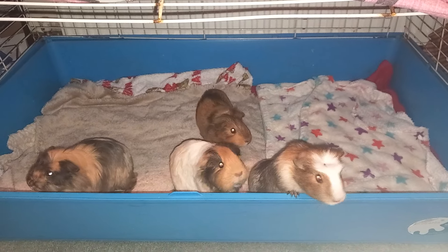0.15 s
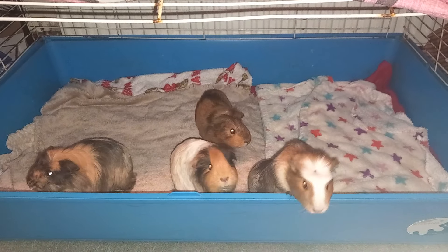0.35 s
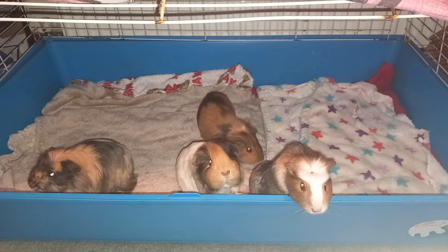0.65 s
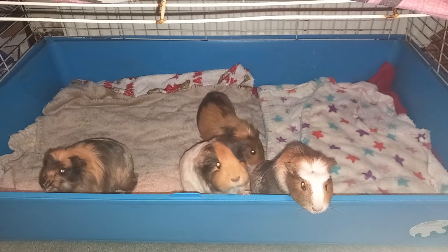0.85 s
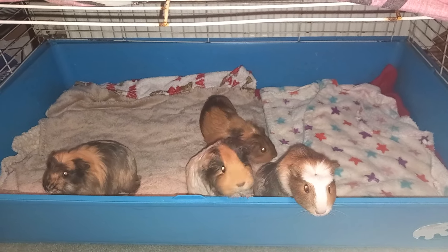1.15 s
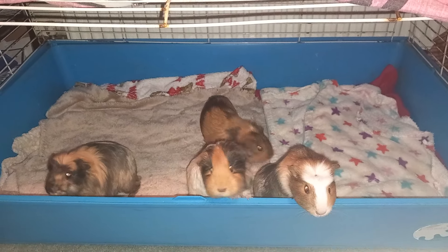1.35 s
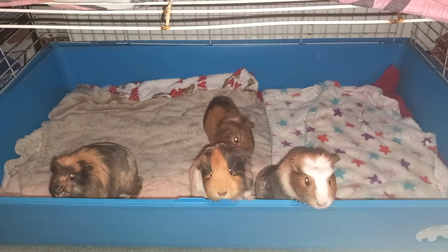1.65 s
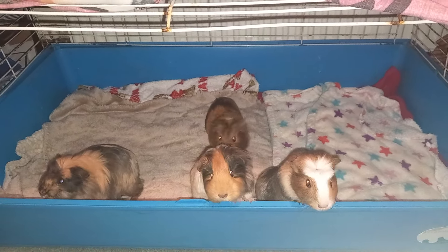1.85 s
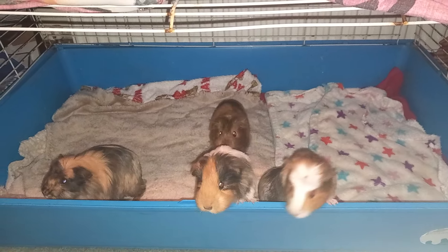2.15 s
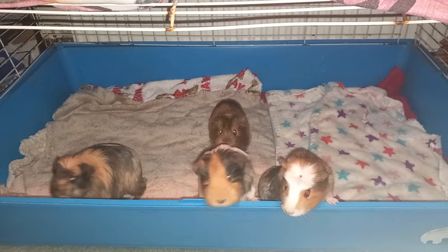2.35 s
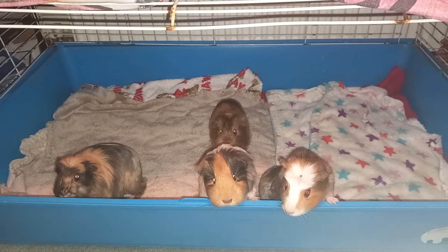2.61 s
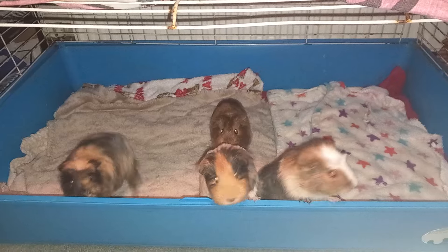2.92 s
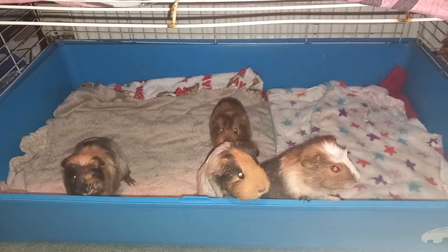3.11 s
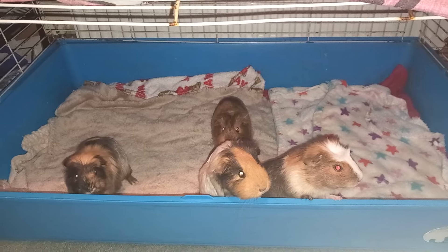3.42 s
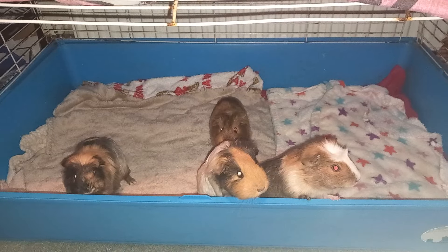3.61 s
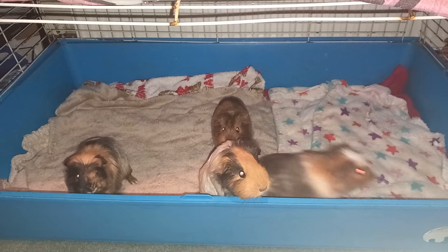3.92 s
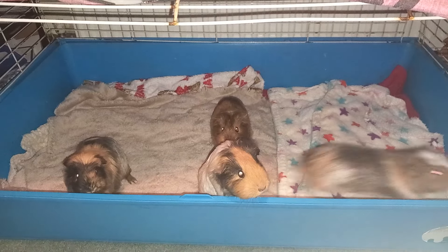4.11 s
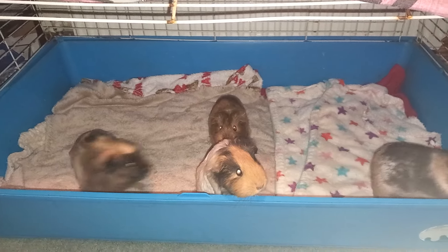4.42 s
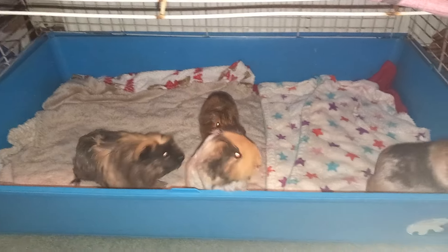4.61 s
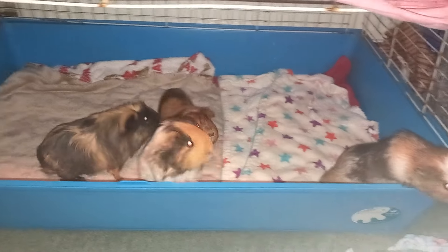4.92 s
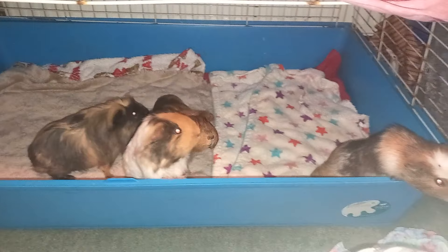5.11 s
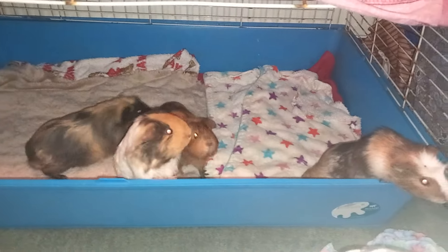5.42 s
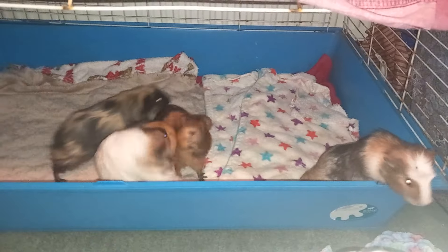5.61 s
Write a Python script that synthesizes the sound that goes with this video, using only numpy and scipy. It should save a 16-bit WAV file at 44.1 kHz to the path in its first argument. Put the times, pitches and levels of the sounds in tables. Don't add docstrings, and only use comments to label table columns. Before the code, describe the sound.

In a quiet room, close to a stereo microphone, guinea pigs murmur and squeak softly. A raspy loud wheek jumps out early, then a cluster of high cries peaks at about three seconds. Paws scuff fleece and claws clack hard on the plastic cage, with dull thumps. Afterwards only small rising squeaks and faint chuts remain over light hiss.

```python
import sys
import numpy as np
from scipy import signal
from scipy.fft import rfft, irfft
from scipy.io import wavfile
from scipy.ndimage import uniform_filter1d

SR = 44100
rng = np.random.default_rng(int(sys.argv[2]) if len(sys.argv) > 2 else 0)


def volts_from_decibels(level):
    exponent = np.asarray(level, float) / 20
    return 10 ** exponent


def output_pcm(signal):
    pcm = np.clip(np.atleast_2d(signal).T, -1, 1) * 32767
    wavfile.write(sys.argv[1], SR, np.round(pcm).astype(np.int16))


N = 254016
EDGE_DB = 19.5

# frequency in Hz, level in dB per Hz.
FLEECE = [(180, -27), (300, -11.5), (621, -13.5), (939, -1.5), (1160, -11), (2010, -0.5), (2860, -9),
          (3410, -8), (7540, -6), (9300, -19), (12500, -14), (15600, -22)]
# frequency in Hz, level in dB.
BREATH = [(400, -7.5), (1200, 7.5), (2400, 8), (3400, -14.5), (4300, -28), (5400, -33), (7700, -17),
          (10500, -44)]


def evened(x):
    return x / np.sqrt(np.mean(x ** 2) + 1e-20)


def read(points, hz):
    f, value = np.transpose(points)
    return np.interp(np.log(hz + 1), np.log(f + 1), value)


def add(mix, s, sound):
    part = mix[max(round(s * SR), 0):][:len(sound)]
    part += sound[:len(part)]


def colour(x, points, lag=((1000, 0),)):
    hz = np.fft.rfftfreq(N, 1 / SR)
    delay = np.exp(-2j * np.pi * hz * read(lag, hz) / SR)
    return irfft(rfft(x) * volts_from_decibels(read(points, hz)) * delay, N)


def wobble(count, seconds):
    width = int(seconds * SR) + 1
    noise = rng.standard_normal(max(count, 9000))[:count]
    return evened(uniform_filter1d(uniform_filter1d(noise, width), width))


def ports(x, side, lag, wet):
    # frequency in Hz, t60 in seconds.
    room = [(300, .14), (2500, .115), (3500, .09), (8000, .11)]
    taps = np.zeros((2, SR // 2))
    at = np.arange(200, SR // 2 - 20, 20)
    at = at + rng.integers(0, 20, (2, len(at)))
    np.put_along_axis(taps, at, rng.choice([-1., 1.], at.shape), 1)
    hz, t, z = signal.stft(taps, SR, nperseg=256)
    tail = signal.istft(z * volts_from_decibels(-60 * t / read(room, hz)[:, None]), SR, nperseg=256)[1]
    size = tail.shape[1]
    wet_gain = volts_from_decibels(read(wet, np.fft.rfftfreq(size, 1 / SR)))
    tail = irfft(rfft(tail) * wet_gain, size) / np.linalg.norm(tail[0])
    left, right = x + signal.fftconvolve(x[None], tail, axes=1)[:, :N]
    return np.array([left, colour(right, [(f, -db) for f, db in side], lag)])


def hush():
    # frequency in Hz, level in dB per Hz.
    floor = [(30, -22), (96, 1), (243, -12), (329, -4.5), (450, -12.5), (600, -13.5), (1240, -17),
             (2500, -17), (3650, -24.5), (7000, -23.5), (9800, -38.5), (12500, -31), (16000, -29)]
    # frequency in Hz, left-right likeness from 0 to 1.
    likeness = [(300, 0.22), (1500, 0.077)]
    frames, hz = N // 256 + 5, np.fft.rfftfreq(1024, 1 / SR)
    a, b, c, d, patches = rng.standard_normal((frames, 513, 5)).T
    patches = evened(uniform_filter1d(uniform_filter1d(patches, 10, 0), 14, 1))
    same = np.clip(read(likeness, hz), -1, 1)[:, None]
    left, other = a + 1j * b, c + 1j * d
    z = np.array([left, same * left + np.sqrt(1 - same ** 2) * other])
    z *= volts_from_decibels(read(floor, hz)[:, None] + 0.5 * patches)
    return volts_from_decibels(-71.5) * evened(signal.istft(z, nperseg=1024, noverlap=768)[1][:, :N])


def thumps():
    # start in seconds, peak in dB, knock in dB.
    feet = [(2.483, -54.5, 3.5), (2.573, -58, 2), (2.694, -49, 4.5), (2.836, -54, 15.5), (3.051, -38, -9.5),
            (3.08, -36, -12.5), (3.094, -33, -8), (3.139, -30, -11.5), (3.178, -35.5, -8),
            (3.203, -50.5, -18), (3.227, -55, 3), (3.444, -51, 5.5), (3.753, -47, 4.5),
            (3.952, -51.5, -8.5), (4.164, -44, -5), (5.619, -55.5, -10), (5.69, -58, -20)]
    # frequency in Hz, level in dB, t60 in seconds.
    panel = [(116.5, -1.5, 0.11), (196, 0.5, .08), (326, 1, .06), (462, -2, 0.067), (970, -1, 0.025),
             (1880, 15, 0.012)]
    out, t = np.zeros(N), np.arange(7000) / SR
    for s, db, knock_db in feet:
        modes = []
        for hz, mode_db, t60 in panel:
            cycles = hz * np.cumsum(1 + 0.14 * wobble(len(t), 0.0043)) / SR
            modes.append(volts_from_decibels(mode_db - 60 * t / t60) * np.sin(2 * np.pi * cycles))
        boom = (1 - np.exp(-t / 0.0049)) * modes[0]
        knock = (1 - np.exp(-t / 0.0021)) * volts_from_decibels(knock_db) * sum(modes[1:])
        add(out, s, volts_from_decibels(db) * (boom + knock))
    return out


def rim():
    # start in seconds, peak in dB, frequency in Hz, t60 in seconds.
    ring = (3.7545, -27, 1800, .025)
    s, db, hz, t60 = ring
    out, t = np.zeros(N), np.arange(3000) / SR
    add(out, s, volts_from_decibels(db - 60 * t / t60) * np.sin(2 * np.pi * hz * t))
    return out


def claws():
    # start in seconds, peak in dB, sharpness from 0 to 1.
    ticks = [(.606, -66, .9), (0.958, -63, 0), (0.9645, -45.5, 0), (2.4844, -36, 0), (2.5197, -42, 0),
             (2.5627, -53, .5), (2.5698, -39, 0), (2.293, -62, .6), (2.768, -47.5, .3), (2.8393, -44, .1),
             (3.0943, -19, 0.5), (3.18, -32, 0.4), (3.2273, -40.5, 0.07), (3.333, -46, .1),
             (3.397, -31, .5), (3.4108, -24, 0.4), (3.4432, -12.5, 0.12), (3.474, -18, 0.11),
             (3.484, -28.5, 0.26), (3.503, -23.5, .9), (3.5234, -25.5, 0.27), (3.5545, -30, .1),
             (3.7568, -33, 0.04), (3.763, -47, 0.2), (3.782, -31, .9), (3.8396, -40, .5), (3.875, -34, .9),
             (3.9328, -40, 0.05), (4.095, -39, .9)]
    out, t = np.zeros(N), np.arange(1500) / SR
    fade = (1 - np.exp(-t / .0004)) * (volts_from_decibels(-60 * t / .014) + .3 * volts_from_decibels(-60 * t / .05))
    for s, db, sharp in ticks:
        burst = rng.standard_normal(len(t)) * fade
        sharpen = np.convolve([1, -sharp], [1, -sharp])
        add(out, s, volts_from_decibels(db - 4.0) * np.convolve(burst, sharpen) / (1 + sharp))
    return colour(colour(out, FLEECE), [(2500, 2.8), (9000, 5.8)])


def paw_moves():
    # start in seconds, length in seconds, level in dB.
    drags = [
        (2.4, 0.35, -71),
        (2.801, 0.1, -68.5),
        (3.001, 0.058, -52),
        (3.094, 0.048, -61.5),
        (3.295, 0.067, -78),
        (3.391, 0.19, -62.5),
        (3.755, 0.34, -64.5),
    ]
    # peak in seconds, peak in dB, rise and fall in seconds, thin hiss in dB.
    strokes = [(2.57, -66.5, 0.03, 0.038, -16), (2.7, -77, 0.051, 0.015, -24),
               (3.095, -41.5, 0.0073, 0.033, -2.5), (3.139, -44.5, 0.02, 0.021, -15.5),
               (3.183, -46, 0.0089, 0.0073, 2), (3.417, -49.5, 0.015, 0.027, -15),
               (3.45, -65.5, 0.012, 0.0325, -15.5), (3.488, -43.5, 0.022, 0.012, -14),
               (3.575, -43.5, 0.011, 0.011, 9.5), (3.589, -54, 0.011, 0.0061, -26),
               (3.6, -85, 0.0042, 0.026, -9.5), (3.841, -60, 0.044, 0.055, 0),
               (3.982, -55.5, 0.11, 0.061, 3), (4.158, -47, 0.066, 0.008, -0.5),
               (5.663, -71, 0.02, 0.016, -1)]
    moves = [([(s, db), (s + length, db)], -17) for s, length, db in drags]
    for s, db, rise, fall, hiss_db in strokes:
        moves.append(([(s - rise, db - EDGE_DB), (s, db), (s + fall, db - EDGE_DB)], hiss_db))
    return moves


def scuffing():
    pressure, hiss = np.zeros((2, N))
    grains = volts_from_decibels(3.0 * np.minimum(rng.exponential(1, N), 5)) * rng.standard_normal(N)
    fizz = evened(colour(grains, FLEECE)) * volts_from_decibels(2.5 * wobble(N, .003))
    for rows, hiss_db in paw_moves():
        s, level_db = np.transpose(rows)
        t = np.arange(s[0], s[-1], 1 / SR)
        ends = np.clip(np.minimum(t - s[0], s[-1] - t) / 0.0086, 0, 1)
        push = ends * volts_from_decibels(np.interp(t, s, level_db) + 3.5)
        add(pressure, s[0], push)
        add(hiss, s[0], push * volts_from_decibels(hiss_db))
    thin = evened(np.convolve(fizz[::-1], [1, -3, 3, -1], "same"))
    return pressure * fizz + hiss * thin


def wheeze():
    # start in seconds, length in seconds, level in dB.
    sniff = (0, 0.24, -63.5)
    # frequency in Hz, level in dB.
    nose = [(2500, -30), (3400, -4), (4290, 6), (4950, -26), (5490, -26), (7700, -1.5), (10500, -24.5),
            (15000, -31)]
    (s, length, db), out = sniff, np.zeros(N)
    add(out, s, volts_from_decibels(db) * signal.windows.tukey(round(length * SR), .15))
    return out * evened(colour(rng.standard_normal(N), nose)) * volts_from_decibels(1.4 * wobble(N, 0.0035))


def voices(calls, throat, breath, jitter, shimmer_db, breath_db, half_db, order, hoarse_db,
           mouths=None, thin_db=np.inf):
    turned = [
        (4.2, 4.3),
        (4.6, 5.8),
    ]
    tone, air = np.zeros((2, N))
    for i, rows in enumerate(calls):
        s, *columns = np.transpose(rows)
        t = np.arange(s[0], s[-1], 1 / SR)
        hz, first_db, upper_db = (np.interp(t, s, c) for c in columns)
        upper_db = np.maximum(upper_db, first_db - thin_db)
        draws = rng.standard_normal((26, 80))
        chance = np.array([np.interp(t - s[0], np.arange(80) * .004, row) for row in draws])
        hz = hz * (1 + jitter * (wobble(len(t), 0.00097) + 0.2 * chance[-1]))
        phase = 2 * np.pi * np.cumsum(hz) / SR
        k = np.arange(.5, min(13, 16000 // hz.min() + .5), .5)[:, None]
        mouth = np.linspace(*mouths[i][:2], len(t)) if mouths else 1
        level_db = upper_db + read(throat, k * hz / mouth) - read(throat, order * hz / mouth)
        if any(a < s[0] < b for a, b in turned):
            level_db -= 5 * np.maximum(k * hz - 2500, 0) / 1000
        level_db[::2] += half_db
        level_db += hoarse_db * chance[:len(k)]
        level_db[1] = first_db + .6 * hoarse_db * chance[1]
        ends = signal.windows.tukey(len(t), min(.012 * SR / len(t), 1))
        swell = volts_from_decibels(shimmer_db * wobble(len(t), .004)) * ends
        waves = np.sin(k * phase + 2 * np.pi * rng.random((25, 1))[:len(k)])
        partials = (k * hz < 16000) * volts_from_decibels(level_db) * waves
        add(tone, s[0], swell * np.sqrt(2) * partials.sum(0))
        puff_db = np.maximum(upper_db, first_db - 13.5) + breath_db
        add(air, s[0], swell * volts_from_decibels(puff_db) * (1 + np.cos(phase)))
    return tone + colour(air * rng.standard_normal(N), breath)


def grunt(row, rise):
    start, length, hz, first_db, third_db = row
    w = np.linspace(-1, 1, 11)
    pitch = hz * (1 + rise * (w + 1) ** 2 / 4)
    return np.transpose([start + (w + 1) / 2 * length, pitch, first_db - 18 * w ** 2, third_db - 6 * w ** 2])


def chuts():
    # start in seconds, length in seconds, pitch in Hz, first and third partial in dB.
    grunts = [(0.06, 0.14, 350.2, -57.5, -54.5), (0.377, 0.046, 315.6, -64.5, -57.5),
              (0.754, 0.046, 319.3, -63, -55), (1.113, 0.086, 316.7, -61.5, -58.5),
              (1.672, 0.14, 319.6, -53.5, -52.5), (1.761, 0.15, 249.2, -68, -73),
              (2.072, 0.1, 309, -55, -56), (4.266, 0.059, 335, -61.5, -70.5),
              (4.495, 0.048, 325, -65.5, -58), (5.07, 0.098, 288.4, -69, -59),
              (4.219, 0.027, 344, -68, -64.5)]
    mouths = [(1.27, 1.396, .05), (0.915, 1.33, .08), (0.86, 1.01, .08), (0.81, 0.78, .12),
              (0.87, 1.2, .18), (1.1, 1.4, .12), (0.82, 1.23, .2), (1.02, 0.5, .08), (0.93, 1.024, .03),
              (0.91, 0.7, .08), (1, 1, .05)]
    # frequency in Hz, level in dB.
    throat = [(600, -16), (1000, 5), (1400, -4), (2000, -18.5), (3000, -24.5), (5200, -43)]
    calls = [grunt(row, mouth[-1]) for row, mouth in zip(grunts, mouths)]
    return voices(calls, throat, BREATH, .022, 2.5, breath_db=-3, half_db=-12, order=3, hoarse_db=5,
                  mouths=mouths)


def squeak(row, kind):
    # pitch in Hz, level in dB.
    second = [(600, -6), (1000, -6), (1400, -13.5), (2000, -23)]
    start, length, from_hz, to_hz, db = row
    bend, attack, release, swell_db, over_db = kind
    u = np.linspace(0, 1, 41)
    hz = from_hz * (to_hz / from_hz) ** (u ** bend)
    ends = np.maximum(1 - u * length / attack, 0) + np.maximum(1 - (1 - u) * length / release, 0)
    first_db = db + swell_db * (2 * u - 1) - EDGE_DB * ends
    return np.transpose([start + u * length, hz, first_db, first_db + over_db + read(second, hz)])


def squeaks():
    # start in seconds, length in seconds, from Hz, to Hz, level in dB.
    climbs = [(0.86, 0.073, 823, 1252, -52.5), (2.14, 0.05, 890, 1620, -48), (2.2, 0.05, 884, 1300, -65),
              (3.62, 0.068, 796, 1062, -57), (3.965, 0.058, 800, 1700, -51), (4.38, .055, 700, 950, -62),
              (5.51, 0.069, 725, 1090, -60), (5.655, 0.1, 532, 940, -62)]
    crests = [
        (4.015, 0.07, 1700, 2050, -50),
        (4.105, 0.062, 2000, 2160, -50),
    ]
    pips = [(3.8, .04, 1020, 1050, -66), (0.412, 0.045, 830, 900, -53), (5.128, 0.027, 620, 760, -64),
            (4.648, 0.04, 1000, 1300, -66), (0.98, .05, 760, 950, -69), (0.246, 0.032, 1100, 1480, -56),
            (0.553, 0.032, 960, 960, -61), (0.604, 0.024, 1020, 830, -55), (0.622, 0.03, 830, 810, -60),
            (0.655, 0.03, 816, 1150, -63), (0.722, 0.035, 856, 846, -61), (2.18, 0.028, 1780, 1740, -56),
            (2.212, 0.03, 1780, 2000, -51), (2.262, 0.036, 1890, 1870, -48), (2.168, .03, 950, 1200, -56),
            (3.883, 0.035, 870, 960, -50), (4.992, 0.045, 770, 830, -65), (5.195, 0.045, 720, 850, -67),
            (5.245, .05, 900, 760, -67), (1.735, .04, 1000, 1300, -53), (1.755, .04, 870, 1150, -54),
            (1.785, .07, 1280, 1380, -53), (1.865, .05, 1450, 1600, -58)]
    honks = [
        (0.918, .055, 1060, 1170, -61),
        (0.187, .05, 920, 1110, -59),
        (.148, .03, 570, 710, -61),
        (.125, .09, 770, 785, -60),
    ]
    # bend of the glide, attack and release in seconds, swell and overtone in dB.
    climb, crest = (1.4, 0.02, 0.009, 1.6, -3), (.8, .006, .012, 2, -8)
    pip = (1, .008, .012, -1, -8)
    honk = (0.887, 0.02, 0.031, 0.6, 12.1)
    # time in seconds, pitch in Hz, first and second partial in dB.
    early = [
        [(0.0, 637, -61, -33.5), (0.01, 627.5, -68, -58), (0.04, 619, -62, -50), (0.06, 730, -68, -50.5),
         (0.075, 806, -85, -56)],
        [(0.393, 622, -76, -71), (0.403, 629, -72, -64), (0.435, 656, -64, -56.5), (0.453, 763, -66, -63.5),
         (0.5, 833, -78, -57)],
        [(0.46, 931, -56, -82), (0.496, 1165, -52.5, -80), (0.534, 1538, -58, -86), (0.542, 1634, -59, -112),
         (0.548, 1830, -57, -80), (0.564, 1860, -50.5, -81), (0.576, 2236, -62.5, -81),
         (0.59, 2200, -70.5, -68), (0.645, 2440, -68, -114)],
        [(0.77, 633, -76, -67), (0.8, 667.2, -59.5, -59), (0.83, 703, -61, -63.5), (0.844, 895, -63, -65),
         (0.854, 922, -51.5, -66), (0.878, 1192, -61, -72), (0.905, 1284, -51, -83)],
        [(1.172, 1060, -65, -72), (1.182, 1280, -60, -80), (1.19, 1440, -58, -73), (1.216, 1804, -62, -76),
         (1.228, 1940, -50.5, -85), (1.252, 1934, -59, -73), (1.256, 2015, -53.5, -86),
         (1.282, 2120, -57.5, -85), (1.32, 2255, -78, -97)],
        [(2.712, 1025, -42, -73), (2.72, 935, -61, -62), (2.744, 834, -49.5, -77), (2.762, 1460, -52.5, -70),
         (2.78, 1603, -51.5, -80), (2.79, 2140, -56, -88), (2.795, 2214, -62, -99)],
    ]
    late = [
        [(4.225, 707, -85, -68), (4.245, 728, -66, -62), (4.271, 695, -59, -62), (4.305, 775, -61, -57.5),
         (4.321, 1027, -60.5, -67), (4.335, 1180, -55.5, -46)],
        [(4.33, 1094, -61, -58.5), (4.362, 1247, -55, -63.5), (4.378, 1513, -57.5, -66.5),
         (4.432, 1907, -52.5, -67.5), (4.46, 1984, -54, -76), (4.468, 2280, -49.5, -99),
         (4.476, 2760, -65, -88.5), (4.508, 3124, -58, -87), (4.535, 3520, -73, -77)],
        [(4.68, 644, -83.5, -76), (4.698, 627.5, -69.5, -69.5), (4.72, 640, -63.5, -70), (4.75, 736, -61, -66),
         (4.796, 1023, -55.5, -63), (4.816, 1074, -56.5, -59), (4.83, 1040, -61, -61.5)],
        [(4.825, 1176, -57, -74), (4.839, 1390, -70, -63), (4.859, 1330, -65.5, -61), (4.879, 1750, -62, -82),
         (4.899, 1747, -58, -78.5), (4.911, 2150, -54.5, -107), (4.917, 2360, -57, -98),
         (4.928, 2900, -73, -116)],
        [(5.14, 1038, -64.5, -89.5), (5.168, 1185, -59, -63), (5.178, 1190, -65.5, -62),
         (5.196, 1595, -63, -67.5), (5.204, 2010, -60, -123), (5.21, 2010, -64, -95), (5.23, 2027, -83, -99)],
        [(5.388, 660, -82, -94), (5.4, 674, -73, -79), (5.416, 644.4, -63.5, -68), (5.46, 683, -61, -75.5),
         (5.484, 860, -62, -76), (5.51, 1001, -68, -75.5), (5.56, 1085, -73, -75)],
    ]
    # frequency in Hz, level in dB.
    near_throat = [(1200, 3), (1900, -6), (2500, -10), (3000, -15), (3700, -19), (4500, -21), (5200, -34.5),
                   (7800, -28.5)]
    far_throat = [(1200, 1), (1900, 5.5), (2500, 1.5), (3200, -9), (4200, -22), (5200, -38), (7800, -29.5),
                  (10500, -45)]
    kinds = (climbs, climb), (crests, crest), (pips, pip), (honks, honk)
    short = [squeak(row, kind) for rows, kind in kinds for row in rows]
    out = voices(short, near_throat, BREATH, .02, 3.5, breath_db=-2, half_db=-33.5, order=2,
                 hoarse_db=1.5, thin_db=25)
    held = voices(early, near_throat, BREATH, .011, 2, breath_db=-9, half_db=-28, order=2,
                  hoarse_db=3, thin_db=25)
    held += voices(late, far_throat, BREATH, .015, 2.5, breath_db=-4, half_db=-26, order=2,
                   hoarse_db=4.5, thin_db=25)
    return out + volts_from_decibels(6.0) * held


def wheeks():
    # time in seconds, pitch in Hz, first and second partial in dB.
    clear = [
        [(2.788, 2177, -53, -82), (2.82, 2203, -58, -77.5), (2.853, 2060, -50, -74)],
        [(2.465, 2587, -38, -79), (2.49, 3095, -29, -87), (2.525, 2810, -82, -84)],
        [(2.855, 2052, -49.5, -48), (2.87, 2088, -32.5, -50), (2.905, 2134, -27, -41), (2.92, 2331, -16, -36),
         (2.945, 2370, -15, -41.5), (2.96, 2501, -24, -38.5), (2.975, 2612, -11.5, -38),
         (2.997, 2709, -14.5, -48), (3.025, 2820, -45, -65.5)],
    ]
    rasps = [
        [(1.375, 2473, -31, -74), (1.39, 2320, -24, -59.5), (1.428, 2230, -34, -59), (1.443, 2393, -17, -61),
         (1.466, 2410, -23.5, -64), (1.485, 2904, -27.5, -56.5), (1.51, 3624, -47, -51.5),
         (1.535, 3830, -78, -76)],
        [(2.325, 1900, -73, -96), (2.337, 1930, -43, -87), (2.35, 2034, -55, -93), (2.375, 1943, -44.5, -79),
         (2.41, 2194, -50, -85), (2.435, 2722, -25.5, -67.5), (2.455, 2538, -29.5, -68),
         (2.49, 2540, -30.5, -103)],
    ]
    flare = [
        (2.997, 3206, -27, -38),
        (3.01, 3608, -32.5, -31),
        (3.02, 3800, -34, -34),
        (3.031, 4050, -38, -34.5),
        (3.045, 4136, -52.5, -47.5),
    ]
    # frequency in Hz, level in dB.
    throat = [(1500, -2.5), (4200, 2), (6500, 0), (7900, 8), (9000, -4), (10800, -4), (12500, -11.5),
              (14200, -4.5), (16000, -9.5)]
    rasp_throat = [(1500, 1.5), (3500, 9.5), (4600, -2), (5800, 3), (7000, 11.5), (8100, 13), (9300, -2.5),
                   (12500, -7.5), (14500, -3)]
    out = voices(rasps, rasp_throat, rasp_throat, .006, 1.2, breath_db=-28, half_db=-6, order=2, hoarse_db=4.5)
    out += voices(clear, throat, throat, .008, 1, breath_db=-24, half_db=-30, order=2, hoarse_db=2.5)
    out += voices([flare], throat, throat, .016, 2.5, breath_db=-12, half_db=-18, order=2, hoarse_db=3)
    return out


def scene():
    # frequency in Hz, left minus right in dB.
    voice_side = [(380, 0), (700, 7), (1290, 8.5), (2380, 10.5), (4400, 1), (8100, -1), (15000, -4)]
    paw_side = [(380, -2), (700, 3), (2380, 4.5), (4400, -7), (8100, -8), (15000, -11)]
    # frequency in Hz, lateness of the right port in samples.
    voice_lag = [(1400, 8.3), (2400, 6.4), (3500, 6.8), (4500, 7.6), (5700, 6.9), (6800, 5.8), (8000, 5.3),
                 (11000, 5), (15000, 3.3)]
    # frequency in Hz, level in dB.
    voice_wet = [(1000, -9), (2500, -9.5), (3500, -2), (9000, -5)]
    feet = ports(thumps(), paw_side, [(1000, -2.0)], [(1000, -7.5)])
    paw_wet = [(1000, -5), (4000, -3), (10000, -5)]
    paws = ports(scuffing() + claws() + rim(), paw_side, [(1000, -21)], paw_wet)
    pigs = ports(wheeze() + chuts() + squeaks() + wheeks(), voice_side, voice_lag, voice_wet)
    return hush() + feet + paws + pigs


def roll_off(x):
    return signal.sosfilt(signal.butter(12, 16810, fs=SR, output="sos"), x)


def record(dry):
    cut = signal.sosfilt(signal.butter(3, 65, "high", fs=SR, output="sos"), dry)
    cut = signal.oaconvolve(cut, signal.firwin(151, 16000, fs=SR)[None], "same")
    return roll_off(cut)


dry = scene()
out = record(dry)
output_pcm(out)
```